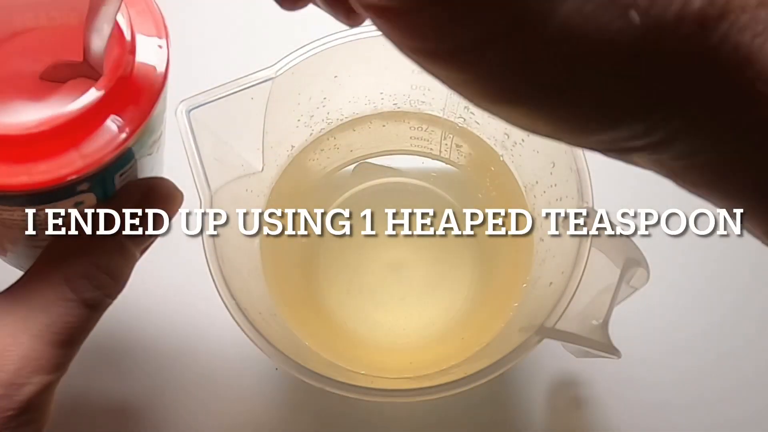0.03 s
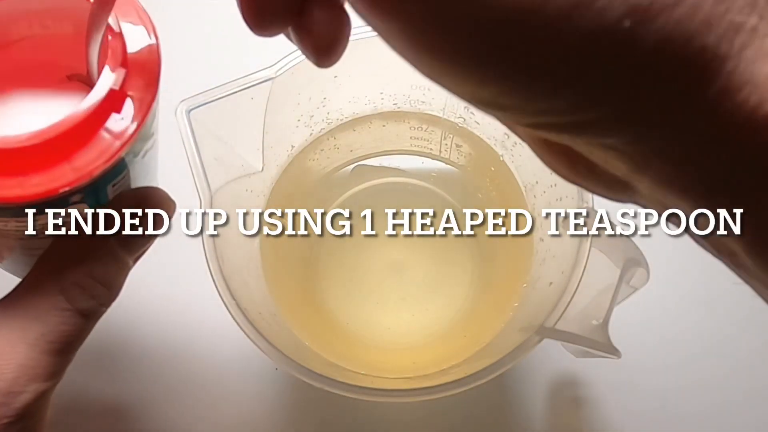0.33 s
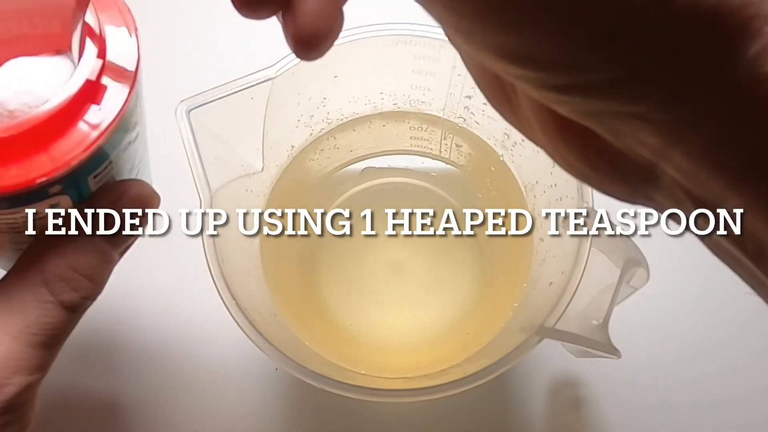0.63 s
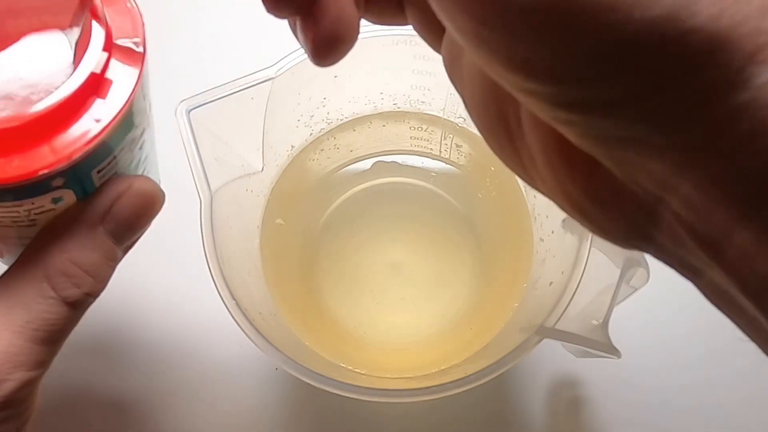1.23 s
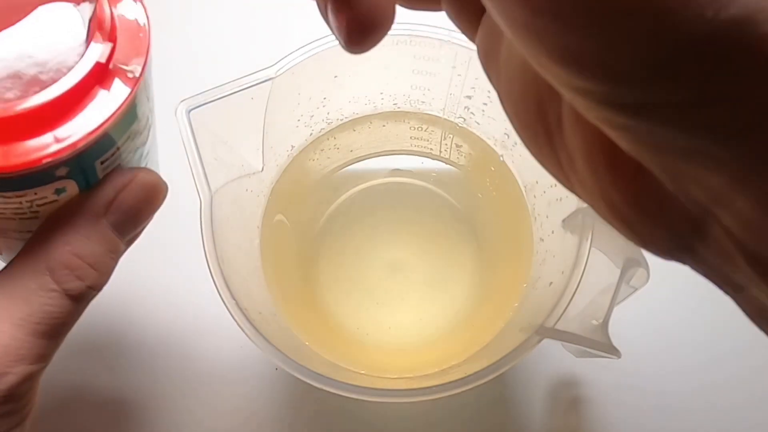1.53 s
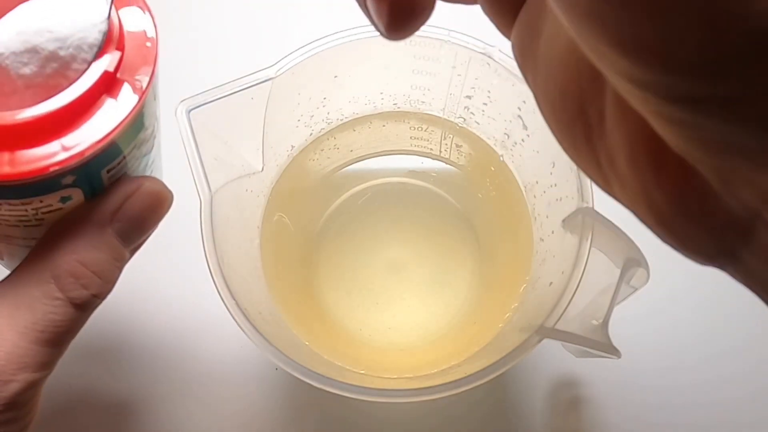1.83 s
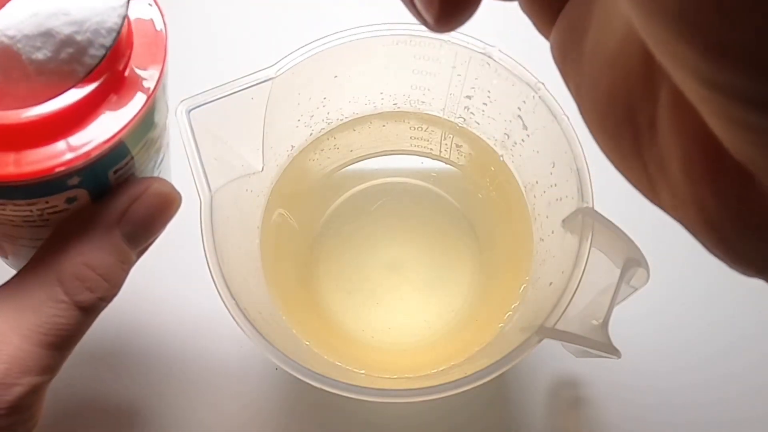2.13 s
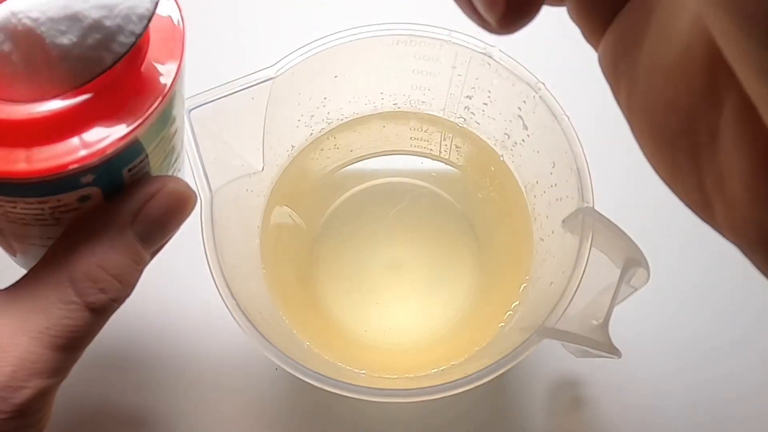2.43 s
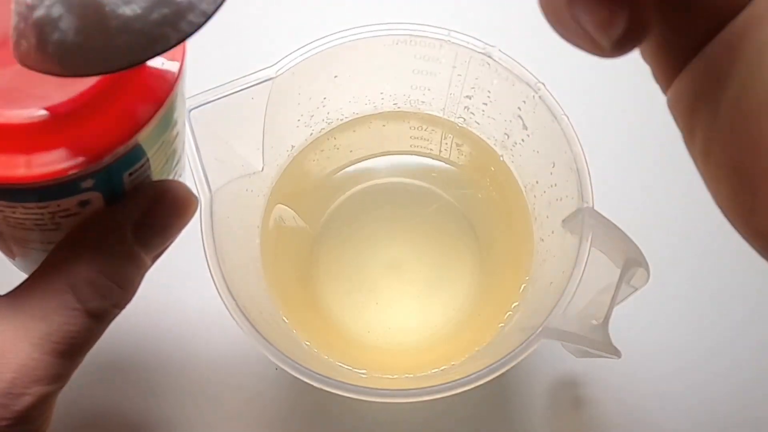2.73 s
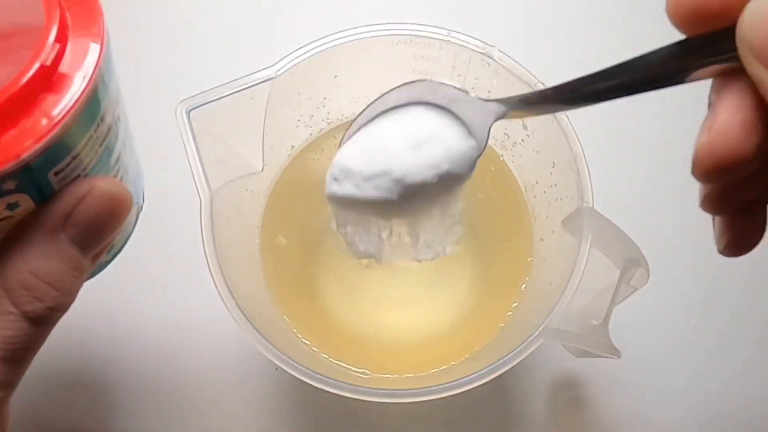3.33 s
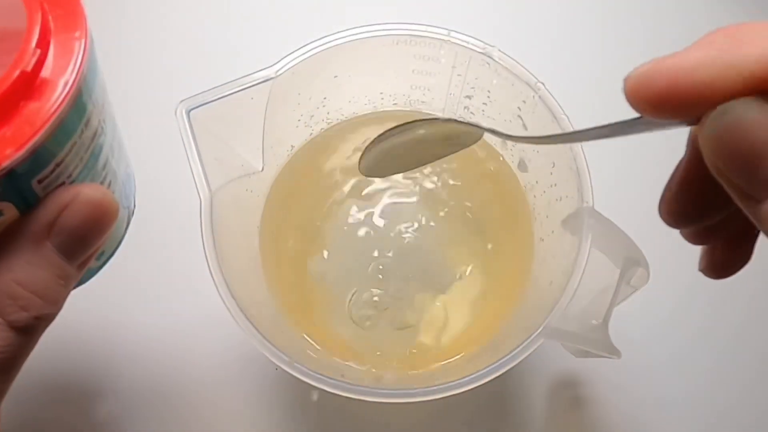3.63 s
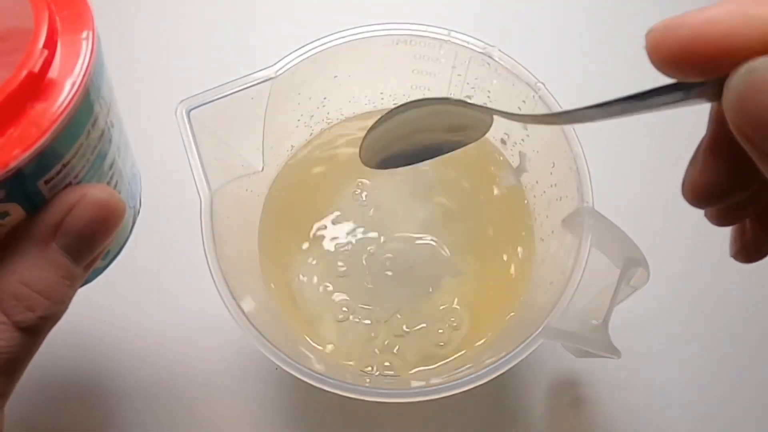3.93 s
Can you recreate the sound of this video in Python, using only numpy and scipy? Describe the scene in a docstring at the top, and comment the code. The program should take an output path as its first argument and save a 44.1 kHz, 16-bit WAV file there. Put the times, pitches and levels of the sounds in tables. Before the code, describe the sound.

One short, close plop of powder landing in liquid comes near the end, after soft scraping of grains and a small tick of a spoon. Tiny bubbles follow, over low kitchen hum, hiss and a faint distant engine.

```python
"""In a quiet kitchen, a heaped teaspoon of powder is tipped into a plastic jug of liquid.
Grains rub on the spoon, the spoon ticks, and the heap slides off and lands in one lump:
a sharp slap with a spray of grains, then a low plop that rings in the liquid, jug and worktop.
A few tiny bubbles burst. Under it all lie hiss, an appliance hum, a faint tone and a distant engine."""
import sys
import numpy as np
from scipy import signal
from scipy.fft import rfft, irfft
from scipy.io import wavfile

SR = 44100
rng = np.random.default_rng(int(sys.argv[2]) if len(sys.argv) > 2 else 0)


def materialize(psi):
    """Save the field psi as 16-bit PCM at rate SR to the path in sys.argv[1].

    A 1-D psi becomes a single channel; in a 2-D psi each row is a channel.
    """
    bounded = np.clip(np.atleast_2d(psi).T, -1, 1)
    quanta = np.round(bounded * 32767).astype(np.int16)
    wavfile.write(sys.argv[1], SR, quanta)


N = 176400
T = np.arange(N) / SR

# A fade_s is the time to die away by 60 dB. A spectrum's levels only set the balance of low and high.
# how long the kitchen echoes: pitch_hz, fade_s
ROOM_FADES = [(100, .45), (400, 0.27), (1000, 0.73), (2500, 0.43), (6000, 0.28), (10000, 0.14),
              (16000, 0.073)]
# steady rumble and hiss: pitch_hz, level_db
HISS_SPECTRUM = [(8.8, -31), (15, 5.5), (32, -2), (52, -7.5), (118, -17), (153, -17), (266, -22),
                 (316, -24), (534, -25.5), (1100, -31.5), (12600, -43.5), (15500, -44.5)]
# the appliance's two notes: pitch_hz, level_db
HUM_NOTES = [(48.6, -46.5), (102, -50)]
# swelling of the upper note: time_s, gain_db
HUM_SWELL = [(0, -2.5), (.55, 2), (.66, -9), (.88, 1.5), (1.1, -7.5), (1.6, 1), (1.8, 3), (2.03, 5.5),
             (2.14, -12), (2.25, 3), (2.7, -9), (3.15, -1.5), (4, -2.5)]
# swelling of the faint tone: time_s, level_db
TONE_LEVELS = [(0, -72), (.65, -71.5), (1.05, -58), (1.35, -64), (1.6, -77), (4, -65)]
# the engine speeding up: time_s, firing_hz, level_db
ENGINE_RUN = [(0, 58.15, -56), (1.2, 60.05, -55), (1.6, 61, -55), (2.15, 61.28, -59), (2.45, 64.18, -45.5),
              (2.7, 67, -52.5), (3.3, 71.5, -51), (4, 75.85, -47)]
# the engine's notes: multiple_of_firing_rate, gain_db
ENGINE_NOTES = [(1, 0.5), (2, -5)]
# bursting bubbles: start_s, level_db, pitch_hz
BUBBLES = [(3.874, -48, 5400), (3.9142, -47, 7100), (3.961, -42.5, 6900), (3.989, -52, 4850)]
# scooping in the tub: time_s, level_db
SCOOP_LEVELS = [(0, -55.5), (.13, -63), (.25, -58.5), (.42, -63.5), (.6, -84), (.8, -100)]
# rustle of the scooping: pitch_hz, level_db
SCOOP_SPECTRUM = [(1000, -8), (3000, -14), (4800, -7), (7000, -11), (10000, -16.5), (15000, -24)]
# powder rubbing on the spoon: start_s, length_s, level_db, strongest_hz
RUBS = [(1.218, .03, -59.5, 2200), (1.689, .03, -54.5, 4860), (1.717, 0.13, -64, 4760),
        (2.458, .022, -58.5, 4200), (3.443, 0.0037, -47, 3850), (3.455, 0.014, -45, 4100),
        (3.46, 0.0042, -42.5, 5800), (3.466, 0.0073, -45.5, 8800)]
# ticks of the spoon: start_s, gain_db
SPOON_TICKS = [(3.3633, -3), (3.3750, -11.5)]
# the spoon's ring: pitch_hz, level_db, fade_s
SPOON_NOTES = [(2095, -31.5, 0.027), (2270, -41, 0.018), (4043, -43, 0.022), (4500, -41, 0.019),
               (5300, -47, .02), (9173, -49, .02)]
# crack of a tick or a bubble: pitch_hz, level_db
CRACK_SPECTRUM = [(800, -30), (1600, -10), (2100, 4), (2900, -13), (4200, 4), (7000, -2), (12500, -10),
                  (16000, -16)]
# the hand jogs and tips the spoon: start_s, gain_db
HAND_BUMPS = [(3.372, -8.5), (3.422, -9), (3.462, 1.5)]
# one soft bump: pitch_hz, level_db, fade_s
BUMP_NOTES = [(32, -25, 0.28), (105, -35, 0.079), (120.4, -21.5, 0.14)]
# ring of liquid, jug and worktop: pitch_hz, level_db, fade_s
PLOP_NOTES = [(31, -25, 0.63), (52.1, -12, 0.4), (103, -18, 0.5), (121.7, -11.5, .26), (181.1, -20.5, 0.28),
              (248, -30, 0.27), (284, -21, 0.21), (340.6, -34, 0.52), (353, -32, 0.54), (421, -30.5, .3),
              (472.5, -30, 0.29), (700, -39, 0.17), (763, -44, 0.3), (874, -39.5, 0.39), (1002, -53, 0.24),
              (1230, -46, .3)]
# liquid churning around the lump: pitch_hz, level_db
CHURN_SPECTRUM = [(40, 6.5), (130, 11), (240, -4), (380, 3), (600, -14), (950, -10), (1300, -16),
                  (1550, -30), (2200, -25), (3000, -48.5)]
# the lump and its crumbs hit the liquid: delay_s, gain_db
SLAPS = [(0.0, 2.5), (0.0013, -13), (0.0042, -6.5), (0.0082, -9), (0.026, -32), (0.044, -27)]
# ring of one slap: pitch_hz, level_db, fade_s
SLAP_NOTES = [(790, -27, 0.014), (1060, -17.5, 0.011), (1960, -28, .009), (4270, -20, 0.0035),
              (5790, -12.5, 0.0034), (7780, -23, 0.0061), (9500, -27, 0.0037)]
# spray of fine grains: pitch_hz, level_db
SPRAY_SPECTRUM = [(300, 6.5), (1100, -1.5), (1500, -4), (2200, -2), (2900, -22.5), (3800, -10),
                  (4800, -1.5), (5600, -3), (7000, -11.5), (8000, -12.5), (9900, -13), (11000, -27),
                  (15000, -30)]

LAND_S = 3.5238  # the lump meets the liquid


def amp(db):
    """Turns decibels into a number to multiply by."""
    return 10 ** (np.asarray(db) / 20)


def unit(x):
    """Scales a signal to an average power of 1."""
    return x / np.sqrt(np.mean(x ** 2) + 1e-20)


def over_time(points):
    """Joins (time, value) points with straight lines."""
    return np.interp(T, *np.transpose(points))


def at_pitch(points, hz):
    """Looks up a table by pitch, with octaves about evenly spaced."""
    pitches, values = np.transpose(points)
    return np.interp(np.log(hz + 1), np.log(pitches + 1), values)


def add(mix, start_s, sound):
    """Mixes a sound in from start_s on."""
    part = mix[max(round(start_s * SR), 0):][:len(sound)]
    part += sound[:len(part)]


def colour(x, spectrum):
    """Shapes a sound's lows and highs, at an average power of 1."""
    gains = amp(at_pitch(spectrum, np.fft.rfftfreq(len(x), 1 / SR)))
    return unit(irfft(rfft(x) * gains, len(x)))


def grains(per_s):
    """A dense stream of random clicks."""
    return rng.standard_normal(N) * (rng.random(N) < per_s / SR)


def fade(fade_s):
    """Dies away by 60 dB in fade_s."""
    return np.exp(-np.log(1000) * T / fade_s)


def sine(cycles):
    """A pure tone with an average power of 1."""
    return np.sqrt(2) * np.sin(2 * np.pi * cycles)


def ring(notes, rise_s):
    """A pushed object rings with its own notes, which build over rise_s and fade."""
    ringing = sum(amp(db) * fade(fade_s) * np.sin(2 * np.pi * hz * T) for hz, db, fade_s in notes)
    return -(1 - np.exp(-T / rise_s)) * ringing


def waver(depth, rate_hz):
    """A gain that wanders slowly and randomly around 1."""
    damping = 1 + (np.fft.rfftfreq(N, 1 / SR) / rate_hz) ** 4
    return 1 + depth * unit(irfft(rfft(rng.standard_normal(N)) / damping, N))


def room(x):
    """The kitchen blurs a sound into an echo whose highs die first."""
    hz, times, noise = signal.stft(rng.standard_normal(SR), SR, nperseg=256)
    decay = np.exp(-np.log(1000) * times / at_pitch(ROOM_FADES, hz)[:, None])
    tail = signal.istft(noise * decay, SR, nperseg=256)[1]
    tail *= np.minimum(T[:len(tail)] / 0.0022, 1)
    return signal.fftconvolve(x, tail / np.linalg.norm(tail))[:N]


def hiss():
    """Steady low rumble and soft hiss."""
    return amp(-44) * colour(rng.standard_normal(N), HISS_SPECTRUM)


def appliance():
    """An appliance hums two wavering notes; the upper one also swells and dips."""
    return sum(amp(db + swell_db) * waver(depth=0.23, rate_hz=7.8) * sine(hz * T)
               for (hz, db), swell_db in zip(HUM_NOTES, [0, over_time(HUM_SWELL)]))


def faint_tone(pitch_hz=279):
    """A faint tone swells and fades."""
    return amp(over_time(TONE_LEVELS)) * sine(pitch_hz * T)


def engine():
    """A distant engine fires faster and faster, so its drone rises."""
    times, firing_hz, levels_db = np.transpose(ENGINE_RUN)
    firings = np.cumsum(np.interp(T, times, firing_hz)) / SR
    level_db = np.interp(T, times, levels_db)
    return sum(amp(level_db + db) * waver(depth=0.58, rate_hz=3.7) * sine(multiple * firings)
               for multiple, db in ENGINE_NOTES)


def bubbles(glide_per_s=20):
    """Each tiny bubble cracks, rings and rises in pitch."""
    out = np.zeros(N)
    for start_s, db, hz in BUBBLES:
        pip = np.sin(2 * np.pi * hz * T * (1 + glide_per_s * T / 2))
        crack = amp(-8) * colour(rng.standard_normal(N), CRACK_SPECTRUM)
        add(out, start_s, amp(db) * fade(0.0085) * (pip + crack))
    return out


def powder(peak_octaves=0.18, spread_octaves=1.6):
    """Grains rub on the spoon as it scoops, lifts and tips."""
    out = amp(over_time(SCOOP_LEVELS)) * colour(grains(per_s=6000), SCOOP_SPECTRUM)
    hz = np.geomspace(500, 16000, 60)
    for start_s, length_s, db, strongest_hz in RUBS:
        octaves = np.log2(hz / strongest_hz)
        peak = np.exp(-0.5 * (octaves / peak_octaves) ** 2)
        spread = amp(-10) * np.exp(-0.5 * (octaves / spread_octaves) ** 2)
        spectrum = np.c_[hz, 20 * np.log10(peak + spread + 1e-9)]
        rub = colour(grains(per_s=6000), spectrum)
        swell = np.sin(np.pi * (T[T < length_s] / length_s) ** 0.53)
        add(out, start_s, amp(db) * swell * rub[:len(swell)])
    return out


def spoon():
    """The spoon ticks, its ring cut short by the fingers; the hand adds soft, low bumps."""
    out = np.zeros(N)
    for start_s, db in SPOON_TICKS:
        crack = amp(-32) * fade(0.011) * colour(rng.standard_normal(N), CRACK_SPECTRUM)
        add(out, start_s, amp(db) * (crack + ring(SPOON_NOTES, rise_s=0.0001)))
    for start_s, db in HAND_BUMPS:
        add(out, start_s, amp(db) * ring(BUMP_NOTES, rise_s=0.013))
    return out


def plop(delay_s=0.00145, rise_s=0.0043):
    """The sinking lump churns the liquid and sets it ringing with the jug and worktop."""
    out = np.zeros(N)
    swell = fade(0.5) * (1 - np.exp(-T / rise_s))
    churn = amp(-24) * swell * colour(grains(per_s=900), CHURN_SPECTRUM)
    add(out, LAND_S + delay_s, ring(PLOP_NOTES, rise_s) + churn)
    return out


def landing():
    """The lump slaps the liquid, sprays grains and plops; the slaps and spray echo."""
    slaps, spray = np.zeros((2, N))
    slap = ring(SLAP_NOTES, rise_s=0.00018)
    for delay_s, db in SLAPS:
        add(slaps, LAND_S + delay_s, amp(db) * slap)
    add(spray, LAND_S, amp(-21) * fade(0.028) * colour(grains(per_s=7000), SPRAY_SPECTRUM))
    return slaps + spray + plop() + room(amp(-18.5) * slaps + amp(-13) * spray)


def scene():
    """Everything heard from close by, in one channel."""
    handling = spoon()
    small_sounds = powder() + bubbles()
    echo = room(amp(-11) * handling + amp(-8.5) * small_sounds)
    foreground = landing() + handling + small_sounds + echo
    background = hiss() + appliance() + faint_tone() + engine()
    return (foreground + background)[None]


def record(dry):
    """Cuts off the very highest pitches."""
    top_hz = 15850
    treble_cut = signal.firwin(511, top_hz, window=("kaiser", 9), fs=SR)
    return signal.oaconvolve(dry, treble_cut[None], "same")


dry = scene()
out = record(dry)
materialize(out)
```